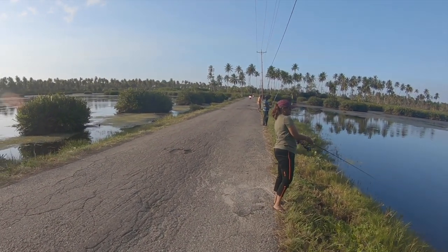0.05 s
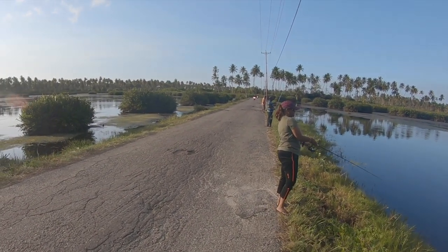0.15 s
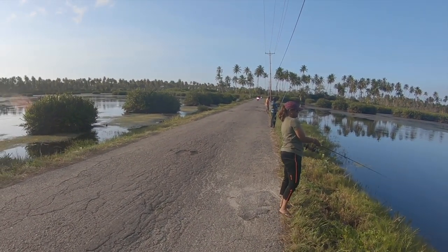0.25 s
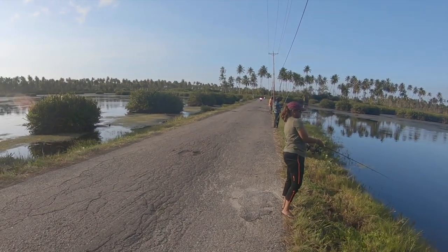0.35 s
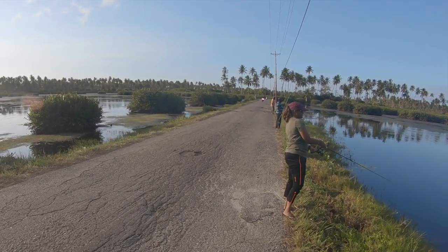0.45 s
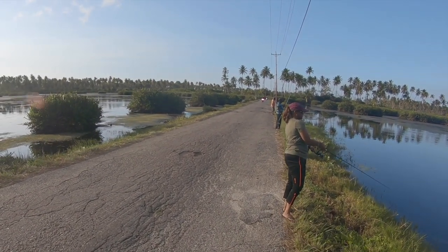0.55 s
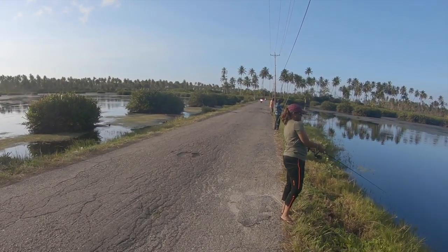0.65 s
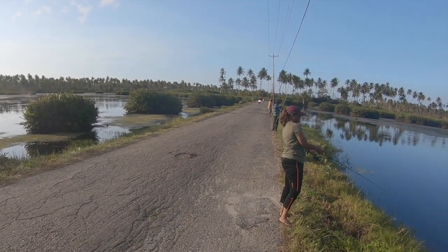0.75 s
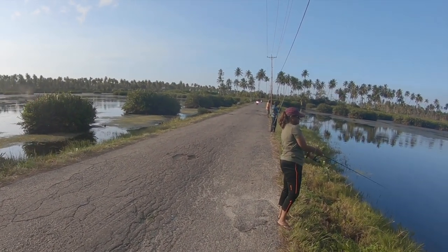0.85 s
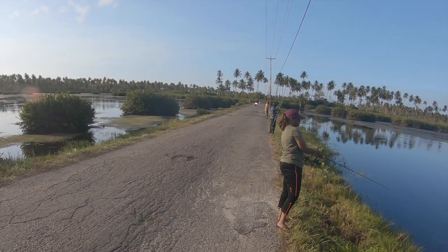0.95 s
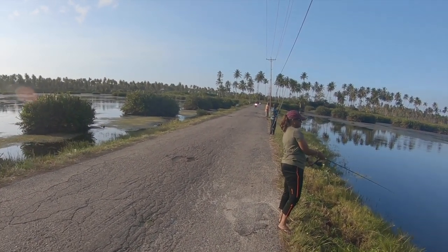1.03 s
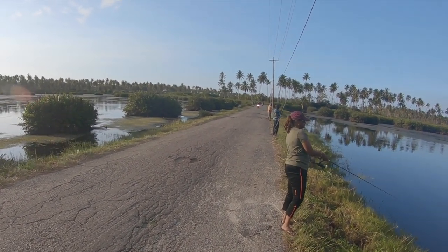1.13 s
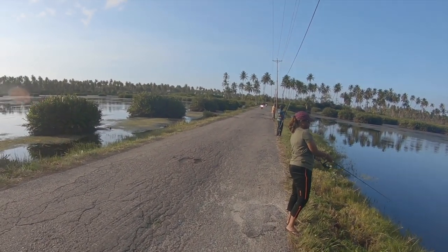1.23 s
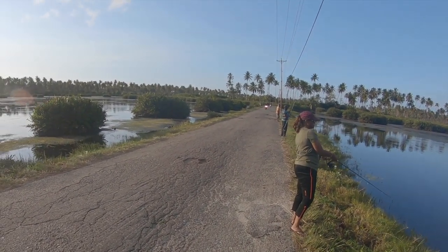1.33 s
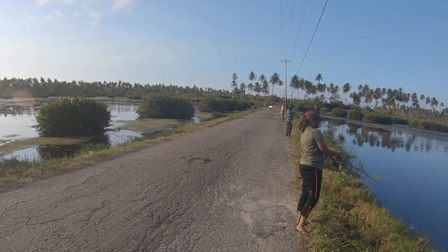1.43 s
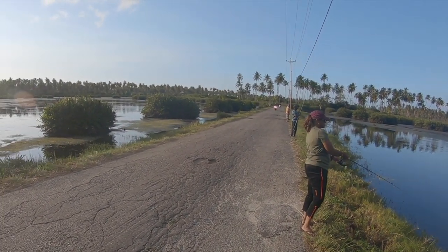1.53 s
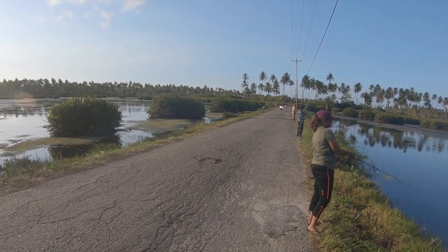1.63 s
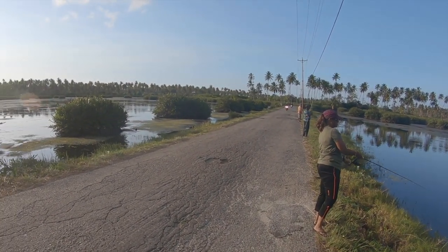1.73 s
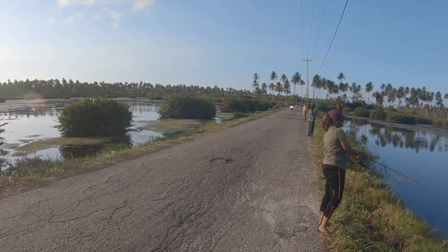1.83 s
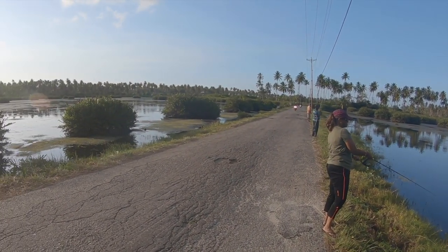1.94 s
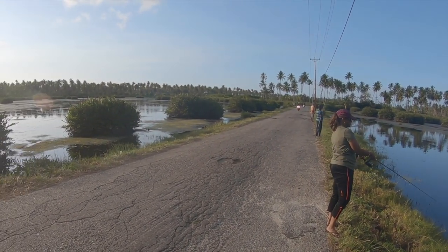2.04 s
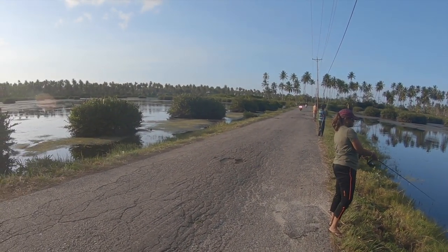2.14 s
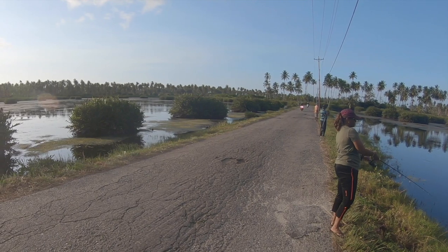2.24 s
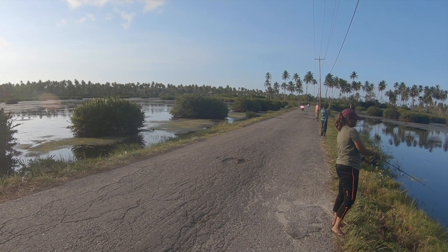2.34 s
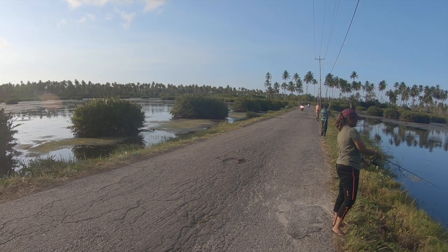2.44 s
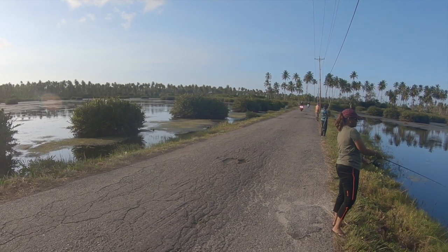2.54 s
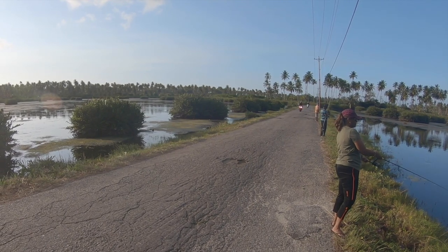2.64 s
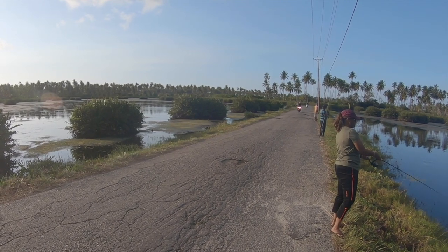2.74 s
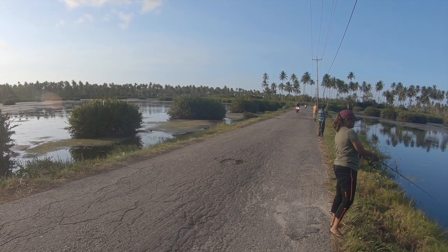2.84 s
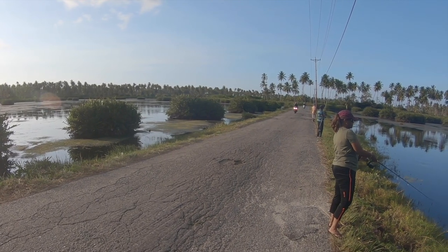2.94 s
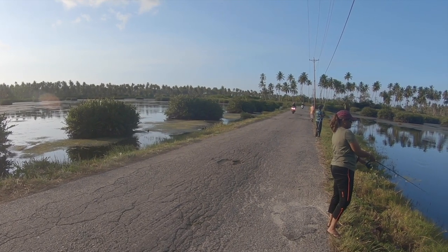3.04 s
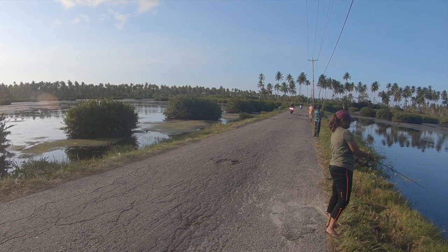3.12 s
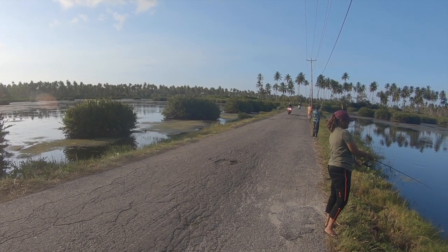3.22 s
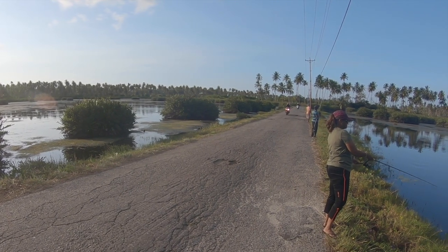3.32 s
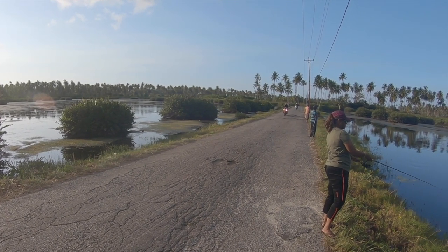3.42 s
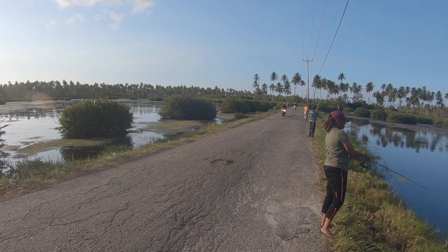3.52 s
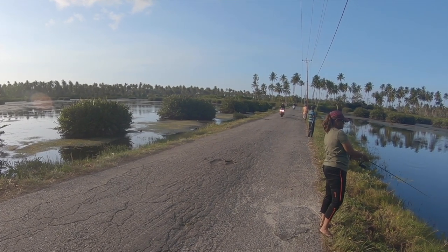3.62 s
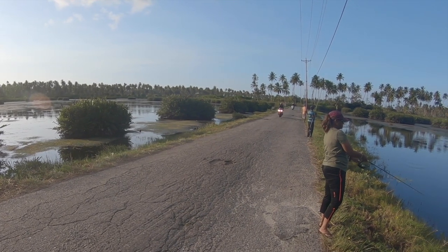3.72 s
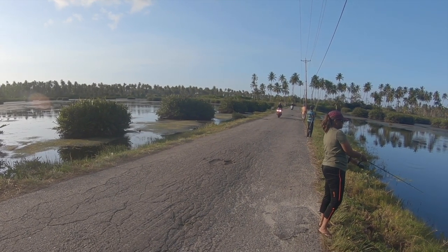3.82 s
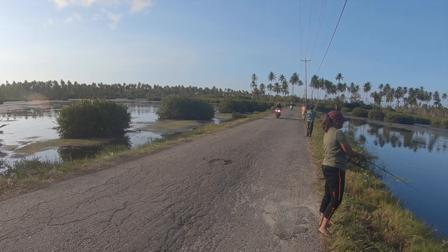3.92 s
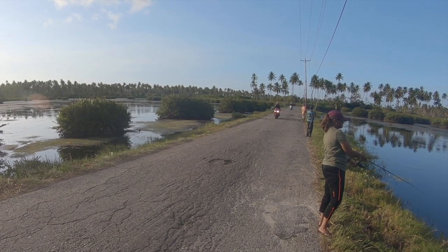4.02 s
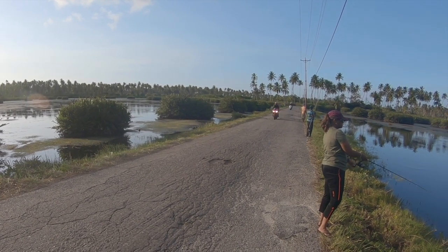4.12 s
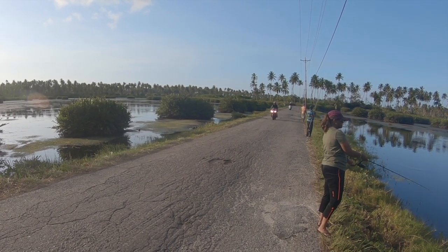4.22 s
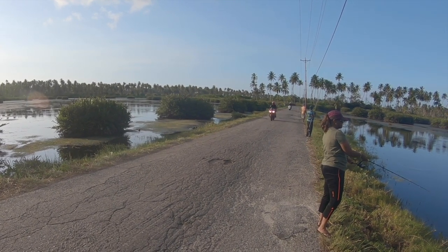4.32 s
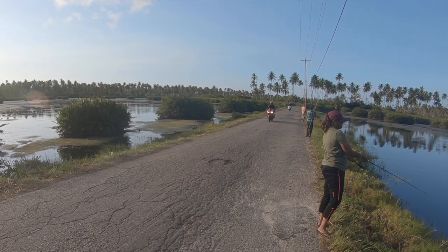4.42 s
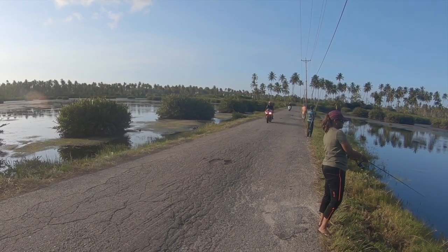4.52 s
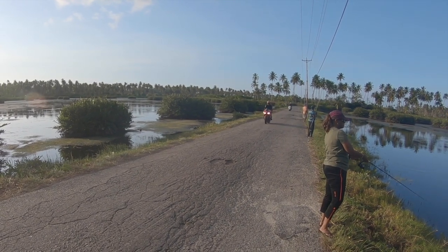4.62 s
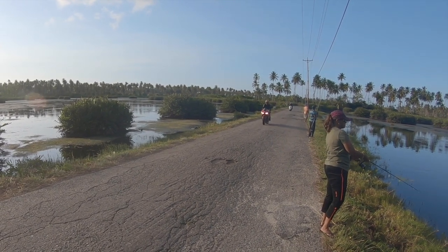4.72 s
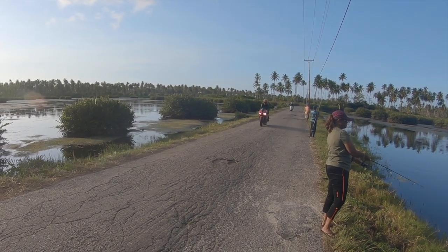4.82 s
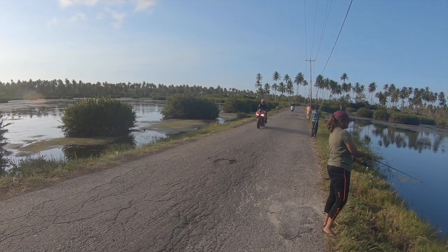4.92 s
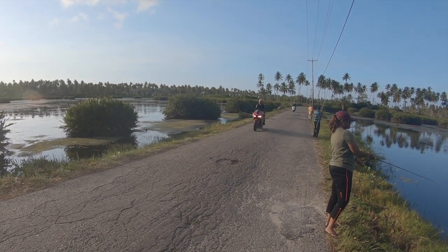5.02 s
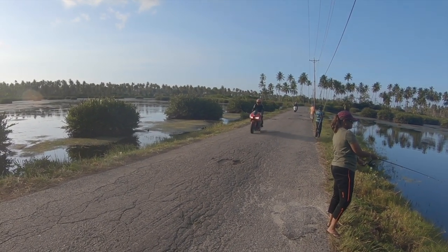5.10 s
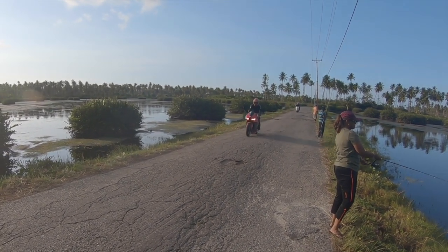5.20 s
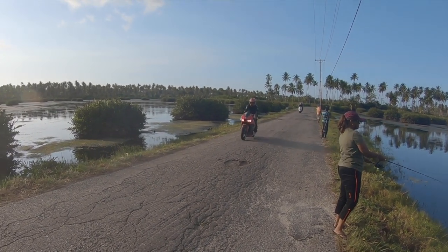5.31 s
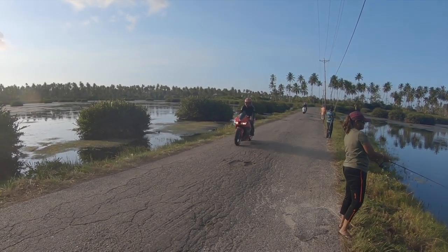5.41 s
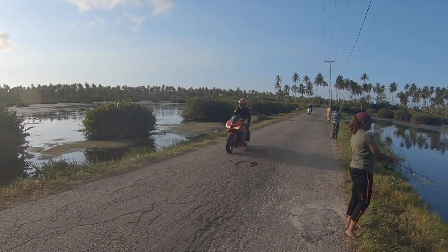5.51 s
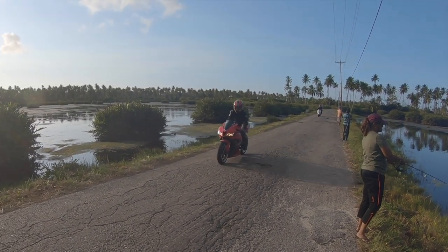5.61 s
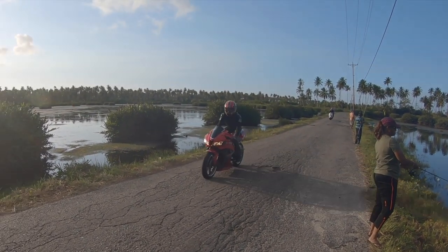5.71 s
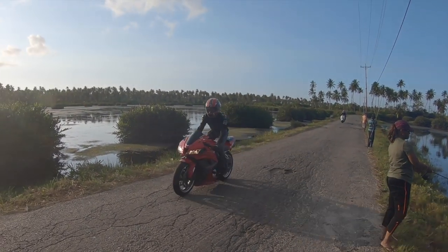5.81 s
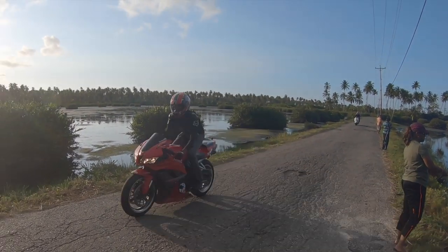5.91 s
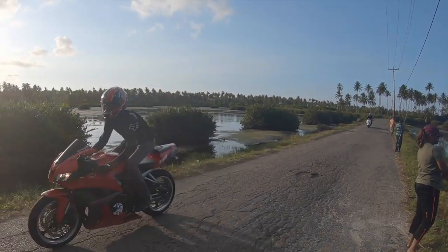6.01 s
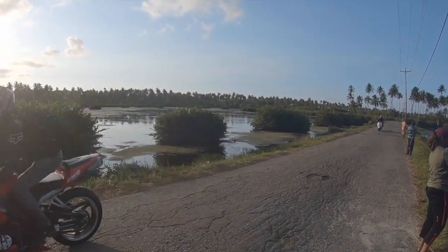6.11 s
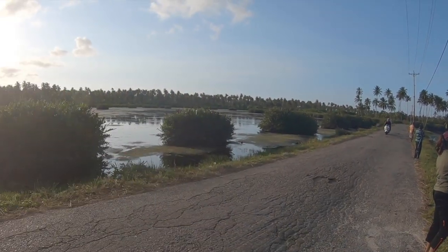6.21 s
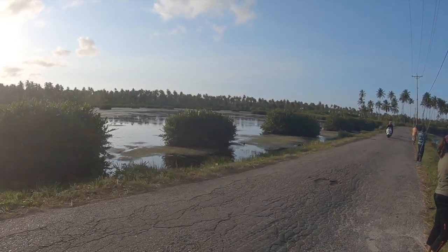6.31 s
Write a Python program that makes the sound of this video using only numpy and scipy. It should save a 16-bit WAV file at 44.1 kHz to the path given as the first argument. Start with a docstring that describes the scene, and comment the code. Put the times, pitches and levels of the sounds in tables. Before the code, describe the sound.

Distant motorcycle engines hum over a low rumble, then the leading bike approaches and sweeps close past to the left.

```python
"""Three motorcycles on a country road.

Their exhaust orders waver in the moving air over a low rumble; the leading four-cylinder passes close
with a rush of tyres and chain. Small birds whistle far off, something ticks nearby, and wind puffs
on the two ports of a microphone on the verge."""
import sys
import numpy as np
from scipy import signal
from scipy.fft import rfft, irfft, next_fast_len
from scipy.io import wavfile
from scipy.ndimage import uniform_filter1d

SR = 44100
rng = np.random.default_rng(int(sys.argv[2]) if len(sys.argv) > 2 else 0)


def unload_audio(sound):
    """Save the sound as a 16-bit wav file, at the path given as the first command line argument."""
    columns = np.transpose(np.atleast_2d(sound))
    # keep every value between -1 and 1, then stretch to whole-number steps
    steps = np.round(np.clip(columns, -1, 1) * 32767)
    wavfile.write(sys.argv[1], SR, steps.astype(np.int16))


N = 280211
T = np.arange(N) / SR
FFT_SIZE = next_fast_len(N + SR // 4)
BIN_HZ = np.maximum(np.arange(FFT_SIZE // 2 + 1) * SR / FFT_SIZE, 1)
SPEED_M_S, PASS_S, KERB_M = 10.2, 6.03, 4.07


def undb(db):
    """Decibels to gain."""
    return 10 ** (np.asarray(db) / 20)


def curves(table):
    """(time, values...) rows to one per-sample curve for each value."""
    times, *cols = np.transpose(table)
    return [np.interp(T, times, col) for col in cols]


def on_bins(points):
    """(frequency, value) rows on the FFT bins, straight on a log axis."""
    hz, value = np.transpose(points)
    return np.interp(np.log(BIN_HZ), np.log(np.maximum(hz, 1)), value)


def walk(rate_hz):
    """Random levels held for 1 / rate_hz and smoothed twice; spread near 1."""
    hold = int(SR / rate_hz)
    steps = np.repeat(rng.standard_normal(N // hold + 1), hold)
    return 1.3 * uniform_filter1d(uniform_filter1d(steps, hold), hold)[:N]


def resonate(x, hz, width_hz, order):
    """Band-pass about hz."""
    band = signal.butter(order, [hz - width_hz / 2, hz + width_hz / 2], "band", fs=SR, output="sos")
    return signal.sosfilt(band, x)


def passing(start_db, rise_db_s, close_db, power, behind_m):
    """Gain: a slow trend plus a 1 / distance ** power swell as the leader goes by."""
    distance_m = np.hypot(SPEED_M_S * (T - PASS_S) - behind_m, KERB_M)
    return np.hypot(undb(start_db + rise_db_s * T), undb(close_db) * (KERB_M / distance_m) ** power)


# (frequency [Hz], coherence of the two ports [0-1])
COHERENCE = [(60, 1), (550, 0.96), (720, 0), (1100, 0.7), (1500, .92), (2000, 0.7), (3500, 0.8),
             (4400, 0.6), (4950, 0.2), (5500, 0.95), (6300, 0.2), (6800, .15), (9000, 0.4)]


def noise(spectrum, flicker_db, rate_hz, bands):
    """Coloured stereo noise, rms 1; each band flickers on its own."""
    coherence, gain = on_bins(COHERENCE), undb(on_bins(spectrum))
    mid = rfft(rng.standard_normal(FFT_SIZE)) * gain * np.sqrt(1 + coherence)
    side = rfft(rng.standard_normal(FFT_SIZE)) * gain * np.sqrt(1 - coherence)
    edges = np.searchsorted(BIN_HZ, np.geomspace(spectrum[0][0], spectrum[-1][0], bands + 1))
    out = 0
    for lo, hi in zip(edges, edges[1:]):
        band = np.zeros((2, len(BIN_HZ)), complex)
        band[:, lo:hi] = mid[lo:hi] + side[lo:hi], mid[lo:hi] - side[lo:hi]
        out += irfft(band, FFT_SIZE)[:, :N] * undb(flicker_db * walk(rate_hz))
    return out / np.sqrt(np.mean(out ** 2))


def exhaust(hz, orders, rms_dbs, waver_db, waver_rad, rate_hz):
    """Orders of one shaft; eddies shake level and phase, the phase more in high orders."""
    cycles = np.cumsum(hz) / SR
    out = 0
    for k, db in zip(orders, rms_dbs):
        gain = np.sqrt(2) * undb(db + waver_db * walk(rate_hz))
        phase = 2 * np.pi * (k * cycles + rng.random())
        out += gain * np.sin(phase + waver_rad * np.sqrt(k) * walk(rate_hz))
    return out


# Jolts as the rear wheel rides the rough road: (time [s], engine cycle rate as heard [Hz])
LEAD_REVS = [(0, 60.06), (.5, 59.91), (.75, 60.67), (1.1, 57.26), (1.6, 56.47), (2.05, 55.47), (2.5, 54.1),
             (3.05, 53.66), (3.24, 51.87), (3.29, 52.87), (3.42, 52.3), (3.59, 53.67), (3.68, 51.78),
             (3.85, 53.46), (3.9, 50.61), (3.97, 51.72), (4.01, 50.69), (4.16, 51.02), (4.21, 52.73),
             (4.29, 50.83), (4.35, 52.07), (4.42, 50.7), (4.55, 51.56), (4.59, 50.37), (4.68, 53.12),
             (4.74, 50.3), (4.81, 52.3), (4.86, 50.66), (4.94, 52.18), (4.98, 50.95), (5.22, 52.46),
             (5.37, 52.19), (5.43, 50.25), (5.5, 52.53), (5.59, 50.73), (5.64, 51.84), (5.79, 51.34),
             (5.85, 52.8), (5.91, 50.9), (5.96, 51.9), (6.0, 49.5), (6.1, 49.34), (6.16, 48.47),
             (6.28, 49.6), (6.35, 48.1)]
# (time [s], order 2 rms [dB], firing order 4 rms [dB], swell of the upper orders [dB])
LEAD_LEVELS = [(0, -31, -42, 2), (.55, -25.5, -45, 2.5), (.65, -24.5, -41, -2.5), (.8, -26, -39.5, -3),
               (1.1, -29, -41.5, -2), (1.6, -25.5, -43.5, -1.5), (2.05, -27.5, -37, -2),
               (2.5, -24, -32, -4.5), (3.05, -29, -33, -2), (3.25, -28.5, -33, 1), (3.6, -24.5, -26, 0.5),
               (3.85, -22.5, -25.5, 1.5), (4.02, -24.5, -26.5, 1.5), (4.2, -24, -20, -0.5),
               (4.45, -24.5, -20, 1), (4.8, -23, -17, 0), (5.2, -22.5, -16, -2.5), (5.45, -18.5, -16, -2),
               (5.85, -18, -15.5, -5), (5.96, -18, -17, -3), (6.01, -17, -16.5, -1), (6.17, -17, -23, 0.5),
               (6.35, -16, -22.5, 2)]
UPPER_ORDERS = (6, 7, 8, 10, 12, 14)
# Base level per upper order: (far [dB], near [dB], pipe end in view [dB], slope after the pass [dB/s])
UPPER_LEVELS = [(-38, -36, -43, 13), (-47, -35, -38, 9.5), (-42, -32.5, -29.5, 9), (-55, -32.5, -23, -1),
                (-58.5, -50, -35, -12), (-58.5, -54, -40.5, -54)]
# (order, level re order 6 [dB])
WEAK_ORDERS = [(1, -8), (3, -8.5), (5, -8), (9, -16.5), (11, -17), (13, -25)]
# Band cancelled by the bounce off the road: (time [s], centre [Hz])
ROAD_NOTCH = [(4.0, 915), (4.9, 703), (5.53, 549), (5.74, 406), (5.95, 332), (6.1, 287)]


def lead_bike():
    """Four-cylinder that steadies as it nears and misfires once; returns sound and crank turns."""
    far_firing_db, near_firing_db = -44.5, -24.5
    misfire_s, misfire_half_s, misfire_depth = 5.982, 0.011, 0.75
    hz, notch_hz = curves(LEAD_REVS)[0], curves(ROAD_NOTCH)[0]
    second_db, firing_db, swell_db = curves(LEAD_LEVELS)
    crank_turns = 2 * np.cumsum(hz) / SR
    nearness = np.clip((firing_db - far_firing_db) / (near_firing_db - far_firing_db), 0, 1)
    waver = 1 - 0.62 * nearness
    upper_dbs = []
    for k, (far_db, near_db, pipe_db, slope_db_s) in zip(UPPER_ORDERS, UPPER_LEVELS):
        in_view = (1 + np.tanh((T - 6.42 + 0.047 * k) / 0.034)) / 2  # earlier for high orders
        base_db = far_db + (near_db - far_db) * nearness + (pipe_db - near_db) * in_view
        after_db = slope_db_s * np.maximum(T - PASS_S, 0)
        fading_db = 3 * waver * walk(7.3)
        notch_db = -7 * np.exp(-(np.log2(k * hz / notch_hz) / 0.17) ** 2)
        upper_dbs.append(base_db + after_db + swell_db + fading_db + notch_db)
    low = exhaust(hz, (2, 4), (second_db, firing_db), 1.3 * waver, 0.3 * waver, rate_hz=18)
    # Uneven firings roughen the upper orders.
    rasp = exhaust(hz, UPPER_ORDERS, upper_dbs, waver_db=1.6, waver_rad=0.1, rate_hz=45)
    weak_dbs = [upper_dbs[0] + db for _, db in WEAK_ORDERS]
    weak = exhaust(hz, [k for k, _ in WEAK_ORDERS], weak_dbs, waver_db=2.5, waver_rad=0.28, rate_hz=18)
    misfire = 1 - misfire_depth * np.exp(-((T - misfire_s) / misfire_half_s) ** 2)
    return (low + rasp + weak + exhaust_pops(crank_turns)) * misfire, crank_turns


# (time [s], tyre roar left minus right [dB], chain whirr [dB], low pop rms [dB], high pop rms [dB])
PASS_BY = [(3.5, 1, -100, -65, -65), (4.5, -1, -95, -62, -52.5), (5.1, -1.5, -96.5, -64.5, -53.5),
           (5.45, 0, -82, -66.5, -66.5), (5.7, -2.5, -70, -48, -55.5), (5.8, -6.5, -67.5, -43, -44.5),
           (5.9, -1.5, -63.5, -39.5, -42.5), (5.96, -1, -54, -39, -48), (6.11, 2.5, -43, -43, -50.5),
           (6.25, 14.5, -47.5, -52.5, -37.5), (6.35, 21.5, -78.5, -47.5, -41)]
# (centre [Hz], width [Hz])
PIPE_RESONANCES = [(700, 200), (930, 220)]


def exhaust_pops(crank_turns):
    """One uneven puff per crank turn rings the pipe's upper resonances."""
    jitter_s, scatter_db = 0.0005, 3.5
    onsets = np.flatnonzero(np.diff(np.floor(crank_turns)))
    timing, strength = rng.standard_normal((len(onsets), 2)).T
    onsets += (jitter_s * SR * timing).astype(int)
    puffs = np.zeros(N)
    puffs[np.clip(onsets, 0, N - 1)] = undb(scatter_db * strength)
    out = 0
    for (hz, width_hz), db in zip(PIPE_RESONANCES, curves(PASS_BY)[2:]):
        ring = resonate(puffs, hz, width_hz, order=2)
        out += undb(db) * ring / ring.std()
    return out


# (time [s], firing rate [Hz], order 1 rms [dB], order 3 rms [dB], order 4 rms [dB])
CHASER_RUN = [(0, 113.7, -29.5, -40, -34), (.45, 118.7, -27.5, -40.5, -33), (.8, 121.5, -33, -52.5, -36),
              (1.05, 129.3, -24.5, -41, -45.5), (1.3, 138.2, -35, -37.5, -61.5),
              (1.55, 143.8, -32.5, -34, -45.5), (2.1, 152.6, -30.5, -38, -60),
              (2.85, 167, -36.5, -35.5, -58.5), (3.7, 178.6, -31.5, -37.5, -68)]


def chasing_bike():
    """Accelerates far behind, sweeping three orders past a pipe resonance, then fades out."""
    ring_orders, ring_hz, ring_half_width_hz = (4.5, 5, 5.5), 790, 120
    hz, first_db, third_db, fourth_db = curves(CHASER_RUN)
    dbs = [first_db, -45.5, third_db, fourth_db, fourth_db - 17]
    carry_db = -56 - 10 * ((T - 2.24) / 0.9) ** 2
    for k in ring_orders:
        detune_db = -10 * ((k * hz - ring_hz) / ring_half_width_hz) ** 2
        dbs.append(carry_db + detune_db + 2.5 * walk(6))
    fade = np.clip((CHASER_RUN[-1][0] - T) / 0.27, 0, 1)
    orders = (1, 2, 3, 4, 6, *ring_orders)
    return fade * exhaust(hz, orders, dbs, waver_db=2.2, waver_rad=0.4, rate_hz=24.01)


# (time [s], firing rate [Hz], order 1 rms [dB])
DEEP_RUN = [(0, 79, -32), (.9, 83, -28.5), (1.9, 88, -28), (2.7, 92, -24.5), (3.2, 92.5, -26),
            (3.7, 92, -31.5), (4.3, 91, -31), (5, 90, -22), (5.6, 88, -33.5), (6.35, 87, -30)]


def deep_bike():
    """A slower engine: firing tone and its octave."""
    hz, first_db = curves(DEEP_RUN)
    return exhaust(hz, (1, 2), (first_db, -38.5), waver_db=0.83, waver_rad=0.1, rate_hz=11)


def throb(crank_turns):
    """Gain that pulses once per crank turn."""
    return 1 + 0.18 * np.cos(2 * np.pi * crank_turns)


# (frequency [Hz], relative density [dB])
TYRE_SPECTRUM = [(900, -19), (1030, -3), (1250, -2.5), (1500, 2.5), (1740, -2.5), (1920, 0.5), (2150, -4.5),
                 (2550, -6.5), (2750, -33)]
# (time [s], level offset [dB])
TYRE_SWELL = [(0, 0), (1.8, -0.5), (2.7, -1.5), (3.5, 1.5), (4.3, 1.5), (5.0, 1), (5.5, 0), (6.35, 0.5)]
# (time [s], lag [ms], gain [0-1])
BANK_ECHO = [(0, 2.6, 0), (1, 2.6, .1), (1.5, 2.59, .6), (3.5, 2.58, .65), (5.2, 2.44, .6), (5.7, 2.3, .1),
             (6.35, 2.3, .1)]


def tyre_roar(crank_turns):
    """Throbbing roar, combed by an echo off the road bank until close; leaves on the left."""
    lag_ms, echo_gain = curves(BANK_ECHO)
    roar = noise(TYRE_SPECTRUM, flicker_db=0.94, rate_hz=16, bands=3)
    roar *= throb(crank_turns) * undb(curves(TYRE_SWELL)[0])
    # The bank is too low to reflect long waves.
    reflected = signal.sosfilt(signal.butter(4, 2100, "high", fs=SR, output="sos"), roar)
    echo = np.array([np.interp(T - lag_ms / 1000, T, side) for side in reflected])
    gain = passing(start_db=-64, rise_db_s=2.5, close_db=-41, power=2.5, behind_m=-0.8)
    pan_db = curves(PASS_BY)[0]
    return gain * undb([pan_db / 2, -pan_db / 2]) * (roar + echo_gain * echo)


# Each: (frequency [Hz], relative density [dB])
RUSH_SPECTRUM = [(2350, -22), (2600, 2.5), (3400, 1), (4100, -3.5), (4600, -4.5), (5000, -6.5), (6100, 0),
                 (7000, -6.5), (7600, -11), (8200, -17.5), (8800, -36)]
HISS_SPECTRUM = [(7800, -18.5), (8300, -6.5), (9500, -11), (10500, -9), (12000, -9), (13500, -11),
                 (14800, -13), (15700, -23)]
SIZZLE_SPECTRUM = [(10000, -20), (11500, -5), (12600, -1.5), (13600, -5), (14500, -21.5)]
WHIRR_SPECTRUM = [(3700, -20), (4200, 1), (5300, -1.5), (5900, -18)]


def tyre_and_chain_rush():
    """Tyre rush and hiss, chain sizzle and whirr; grittier up close, panned less than the roar."""
    pan_db, whirr_db = curves(PASS_BY)[:2]
    rush = noise(RUSH_SPECTRUM, flicker_db=0.81, rate_hz=23, bands=6)
    rush *= passing(start_db=-69.5, rise_db_s=3, close_db=-42, power=2.5, behind_m=0)
    hiss = noise(HISS_SPECTRUM, flicker_db=1.5, rate_hz=15, bands=3)
    hiss *= passing(start_db=-88.5, rise_db_s=0.85, close_db=-59.5, power=2.8, behind_m=1)
    sizzle = noise(SIZZLE_SPECTRUM, flicker_db=1.5, rate_hz=20, bands=2)
    sizzle *= passing(start_db=-105, rise_db_s=0.5, close_db=-65, power=4, behind_m=0)
    whirr = undb(whirr_db) * noise(WHIRR_SPECTRUM, flicker_db=0.92, rate_hz=17, bands=2)
    grit_db = 1.5 * walk(200) * passing(start_db=-20, rise_db_s=0, close_db=0, power=1, behind_m=0)
    pan = undb([0.095 * pan_db, -0.095 * pan_db])
    return pan * undb(grit_db) * (rush + hiss + sizzle + whirr)


# (frequency [Hz], relative density [dB])
THUD_SPECTRUM = [(20, -11.5), (30, 0), (55, 1.5), (75, -13)]


def air_thud():
    """Air pushed aside by the passing bike."""
    gain = passing(start_db=-51.5, rise_db_s=1, close_db=-30.5, power=3, behind_m=5)
    return gain * noise(THUD_SPECTRUM, flicker_db=2, rate_hz=8, bands=1)


# Each: (frequency [Hz], relative density [dB])
RUMBLE_SPECTRUM = [(18, -40), (28, -26), (54, -6), (102, 1), (220, -12.5), (260, -14.5), (350, -14.5),
                   (480, -14), (600, -23), (680, -55)]
GROWL_SPECTRUM = [(540, -17), (620, 2), (690, -5.5), (760, 0), (1000, -6.5), (1100, -20)]


def exhaust_rumble(crank_turns):
    """Rumble and throbbing growl of far exhausts, swelling at the pass."""
    rumble = noise(RUMBLE_SPECTRUM, flicker_db=1.6, rate_hz=5.5, bands=4)
    rumble *= passing(start_db=-25.3, rise_db_s=-0.05, close_db=-25, power=4, behind_m=2)
    growl = noise(GROWL_SPECTRUM, flicker_db=2.2, rate_hz=6.9, bands=3)
    growl *= passing(start_db=-52, rise_db_s=0.12, close_db=-40, power=3, behind_m=0)
    return rumble + throb(crank_turns) * growl


# (frequency [Hz], relative density [dB])
TRAFFIC_SPECTRUM = [(1000, -12), (1100, 0), (1400, -3), (1600, -13.5)]


def far_traffic():
    """Distant tyres, slowly growing louder."""
    return undb(-62 + 0.31 * T) * noise(TRAFFIC_SPECTRUM, flicker_db=0.99, rate_hz=15, bands=1)


# (time [s], peak [dB], centre [Hz], length [s], width [Hz])
NEAR_TICKS = [(0.29, -55, 6170, .008, 2000), (0.301, -49, 2600, 0.002, 2000),
              (0.322, -47, 2500, .003, 2010), (0.364, -46, 2920, 0.001, 1790),
              (0.376, -46, 2490, 0.0013, 1500), (0.386, -45, 2000, 0.0022, 1500),
              (0.398, -49, 3220, 0.0022, 1500), (0.408, -45, 3050, 0.0035, 1800),
              (0.416, -41.5, 3200, 0.0019, 2000), (0.41, -52, 7100, .005, 1980),
              (0.481, -46, 3800, 0.0013, 3500), (.521, -48, 2580, 0.0018, 2000),
              (1.119, -42.5, 2000, 0.0011, 1800), (1.123, -51, 6160, 0.017, 3500),
              (1.135, -52, 3600, .012, 1500), (1.508, -52, 3950, 0.0016, 695.6),
              (1.512, -42, 3170, 0.0032, 447), (4.166, -45, 2600, 0.0081, 2000),
              (4.293, -42, 3200, 0.004, 2500), (5.649, -36.5, 3170, 0.008, 2000),
              (5.728, -42, 5330, 0.0059, 2000), (6.052, -36, 5770, 0.004, 1800),
              (6.298, -47, 6300, .005, 2480), (6.306, -29, 2220, .004, 2500)]


def ticks():
    """Short noise bursts, each in one resonance, with a faint tail."""
    out = np.zeros(N)
    t = np.arange(SR // 12) / SR
    for start_s, peak_db, hz, length_s, width_hz in NEAR_TICKS:
        strike = t / length_s * np.exp(-2 * t / length_s)
        tail = 0.12 * np.tanh(t / length_s) * np.exp(-t / 0.007)
        burst = resonate(rng.standard_normal(len(t)) * (strike + tail), hz, width_hz, order=3)
        slot = out[int(start_s * SR):][:len(t)]
        slot += undb(peak_db) * burst[:len(slot)] / np.abs(burst).max()
    return out


# (time [s], length [s], start pitch [Hz], end pitch [Hz], level [dB])
BIRD_CALLS = [(0.088, 0.04, 3930, 3880, -72), (.288, 0.055, 4060, 4060, -72),
              (0.996, 0.052, 5640, 5300, -73), (1.18, 0.081, 3060, 3170, -66),
              (1.333, .055, 5300, 5200, -71), (1.34, 0.05, 4000, 3980, -74),
              (1.413, 0.064, 3070, 3020, -70), (1.796, 0.048, 5280, 5100, -73),
              (1.79, 0.071, 3900, 3860, -72), (1.906, 0.056, 5350, 5400, -75),
              (1.94, 0.062, 3130, 3150, -74), (2.149, 0.038, 4700, 3980, -66),
              (2.248, 0.055, 4802, 3850, -65), (2.359, 0.043, 4780, 4148, -64),
              (2.464, 0.056, 4870, 3980, -68), (2.575, 0.074, 4740, 4030, -69),
              (2.715, 0.053, 4612, 3803, -70), (2.835, 0.055, 4650, 3900, -70),
              (2.96, 0.051, 4830, 3980, -73)]
# (lag [s], gain [dB])
TREE_ECHOES = [(.007, -8), (.013, -10), (.022, -10)]


def birds():
    """Far, fluttering whistles that echo off the trees; wider glides warble more."""
    calls = np.zeros(N)
    flutter, warble = walk(220), walk(200)
    for start_s, length_s, start_hz, end_hz, db in BIRD_CALLS:
        progress = np.linspace(0, 1, int(length_s * SR))
        span = slice(int(start_s * SR), int(start_s * SR) + len(progress))
        glide_hz = start_hz + (end_hz - start_hz) * progress ** 2
        warble_depth = 0.011 + 0.06 * abs(end_hz / start_hz - 1)
        phase = 2 * np.pi * np.cumsum(glide_hz * (1 + warble_depth * warble[span])) / SR
        flutter_db = 5 * (flutter[span] - flutter[span].mean())
        envelope = np.sqrt(np.sin(np.pi * progress ** 0.7) + 1e-9)
        calls[span] += np.sqrt(2) * undb(db - 2 + flutter_db) * envelope * np.sin(phase)
    return calls + sum(undb(db) * np.roll(calls, int(lag_s * SR)) for lag_s, db in TREE_ECHOES)


# (frequency [Hz], relative density [dB])
BUFFET_SPECTRUM = [(20, -8), (35, 13.5), (80, 7), (130, -20), (200, -46)]
# (time [s], peak [dB], frequency [Hz], decay [s])
WIND_PUFFS = [(4.096, -21, 80.2, 0.015), (4.44, -40, 72, .03), (4.898, -33.5, 87, .05),
              (5.199, -34.5, 80, .04), (6.21, -41, 75, .03)]


def wind():
    """Low buffeting and single puffs push the two ports opposite ways."""
    spectrum = rfft(rng.standard_normal(FFT_SIZE)) * undb(on_bins(BUFFET_SPECTRUM))
    buffet = irfft(spectrum, FFT_SIZE)[:N] * undb(4 * walk(5))
    out = undb(-44.5) * buffet / np.sqrt(np.mean(buffet ** 2))
    for start_s, peak_db, hz, decay_s in WIND_PUFFS:
        age = np.maximum(T - start_s, 0) / decay_s
        out += undb(peak_db) * age * np.exp(1 - age) * np.sin(2 * np.pi * hz * (T - start_s))
    return np.array([out, -out])


# (frequency [Hz], left minus right [dB])
PORT_BALANCE = [(60, -3.5), (100, -1), (170, -2), (300, -3), (520, -6), (740, -4.5), (830, -3),
                (1400, -1.5), (1620, -3), (3000, -1.5), (4700, -1), (5400, -1.5), (6800, 3.5), (7400, 3),
                (8000, 7.5), (9000, -1.5)]
# (frequency [Hz], left phase lead [rad])
PORT_PHASE = [(600, 0.098), (950, 0.26), (1380, 1), (1720, 0.27), (2500, 0.0033), (3100, 0.21),
              (4050, 0.23)]


def housing(air):
    """The microphone housing shifts level and phase between the ports."""
    tilt = undb(on_bins(PORT_BALANCE) / 2) * np.exp(0.5j * on_bins(PORT_PHASE))
    response = np.array([tilt, 1 / tilt]) * 2 / np.abs(tilt + 1 / tilt)
    padded = np.pad(air, ((0, 0), (0, FFT_SIZE - N)), "reflect")
    return irfft(rfft(padded) * response, FFT_SIZE)[:, :N]


def scene():
    """Bikes, road noise, ticks and birds through the housing, plus wind on the ports."""
    leader, crank_turns = lead_bike()
    engines = leader + chasing_bike() + deep_bike()
    gust = undb(0.44 * walk(16))
    road = gust * tyre_roar(crank_turns) + air_thud() + exhaust_rumble(crank_turns)
    road += gust * tyre_and_chain_rush() + far_traffic()
    return housing(engines + road + ticks() + birds()) + wind()


# (frequency [Hz], relative density [dB])
SELF_NOISE_SPECTRUM = [(2000, -21.5), (3000, 1.5), (5000, -3.5), (6800, -3.5), (7500, 6.5), (7900, -6),
                       (8200, -25.5), (15000, -42)]


def record(dry):
    """The microphone adds its own hush, rounds the loudest peaks and cuts the top."""
    hush = undb(-70.5) * noise(SELF_NOISE_SPECTRUM, flicker_db=0.6, rate_hz=16, bands=4)
    rounded = np.tanh(1.16 * (dry + hush)) / 1.103
    return signal.sosfilt(signal.ellip(8, 0.2, 70, 15700, fs=SR, output="sos"), rounded)


dry = scene()
out = record(dry)
unload_audio(out)
```